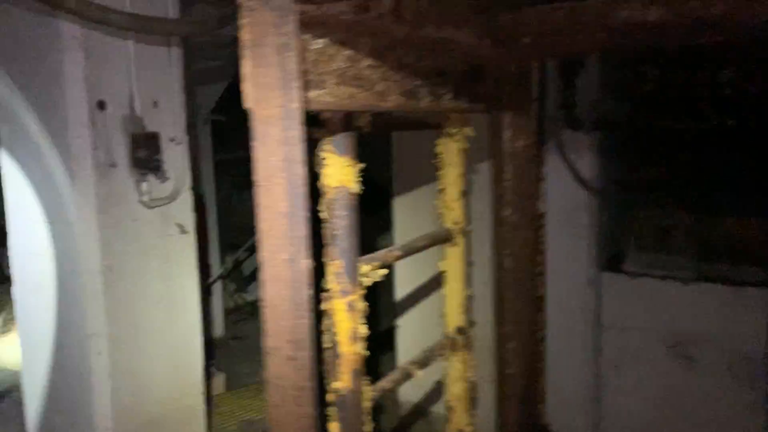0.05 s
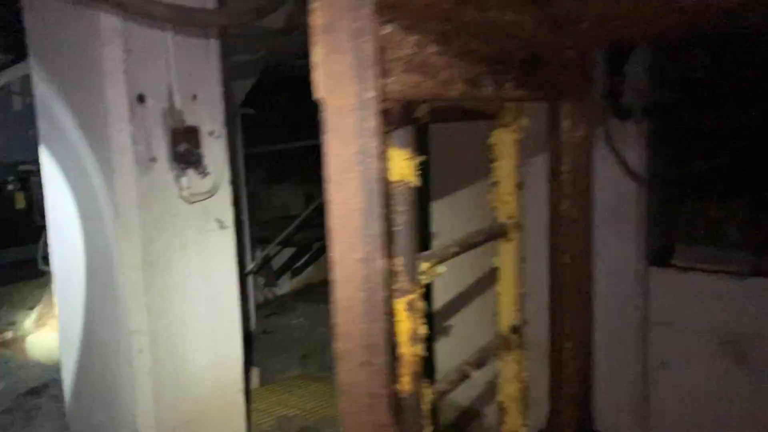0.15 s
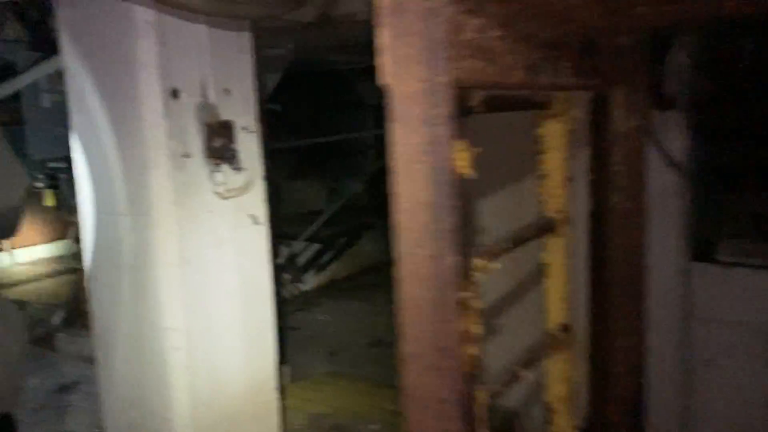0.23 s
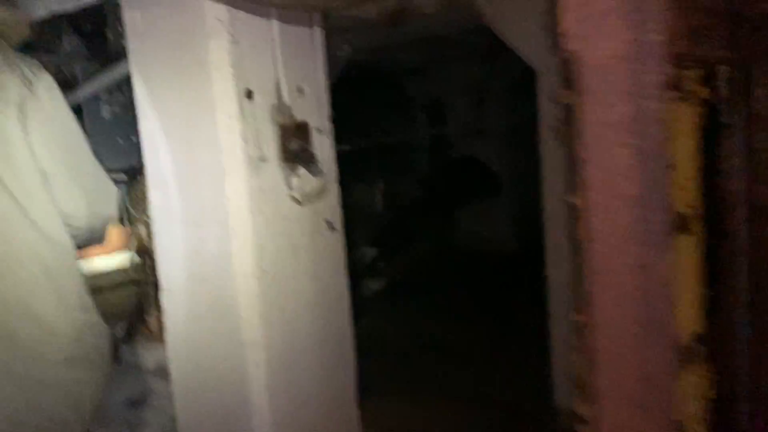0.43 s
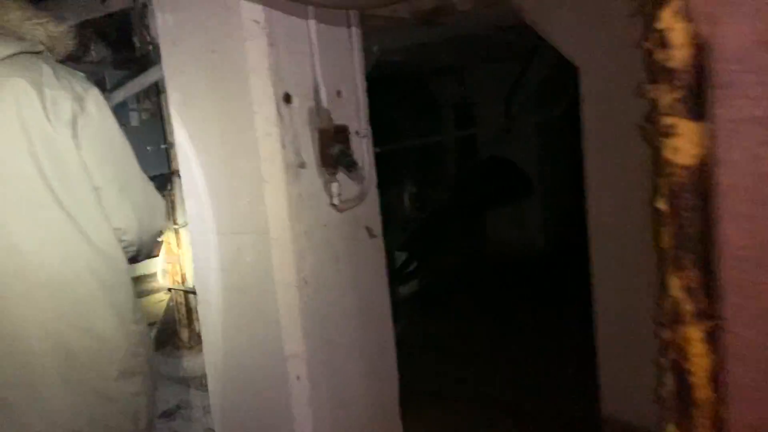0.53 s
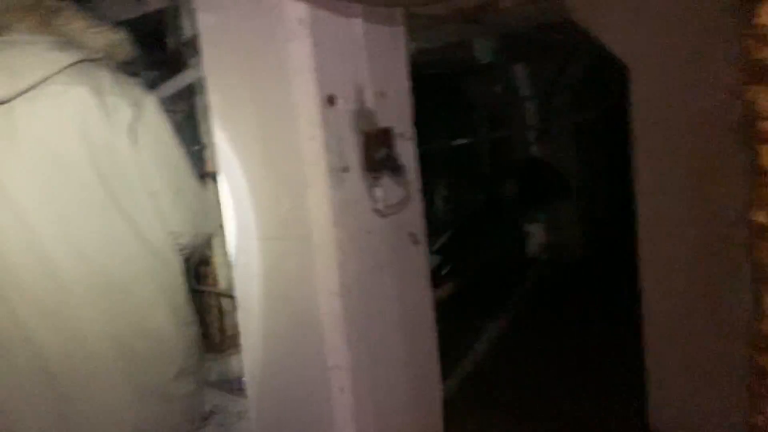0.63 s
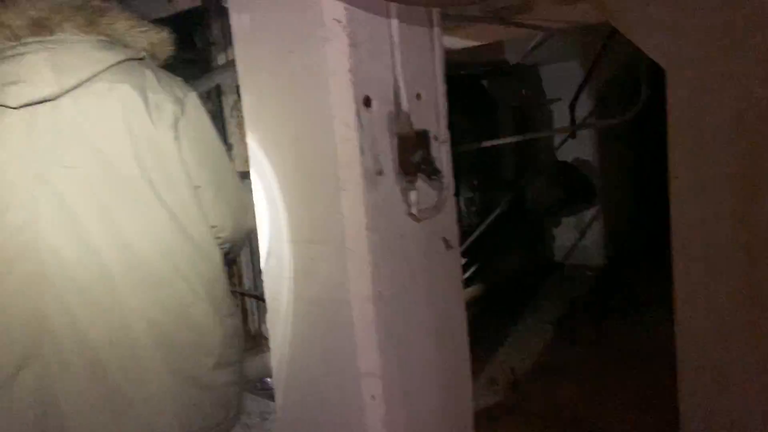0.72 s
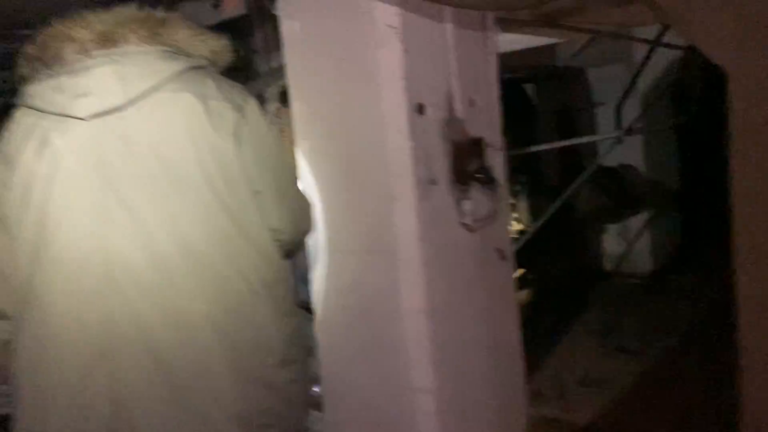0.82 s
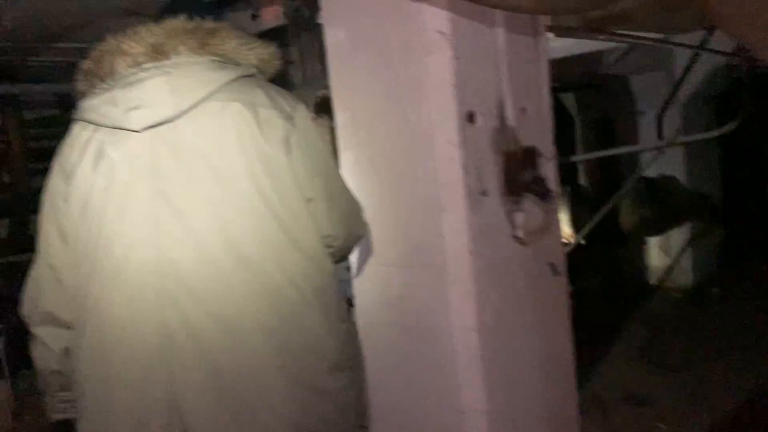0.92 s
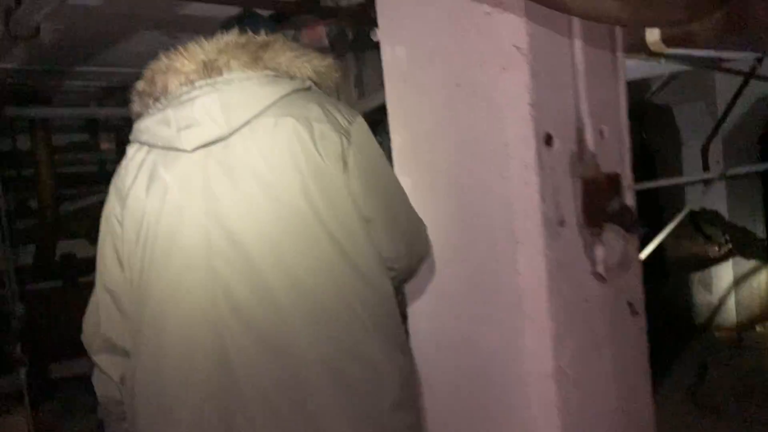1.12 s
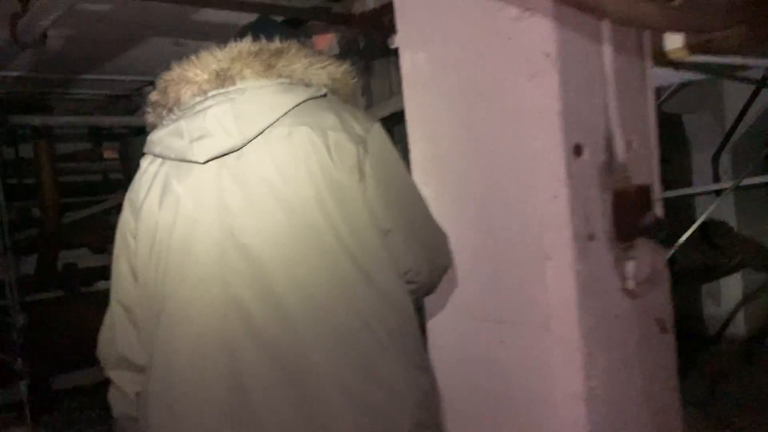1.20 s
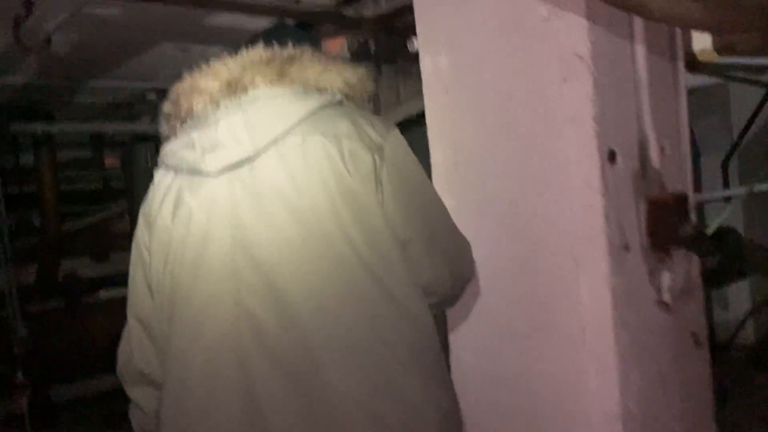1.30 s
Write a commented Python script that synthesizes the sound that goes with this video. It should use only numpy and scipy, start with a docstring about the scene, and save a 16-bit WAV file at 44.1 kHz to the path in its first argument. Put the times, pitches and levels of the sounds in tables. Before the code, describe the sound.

A footstep crunches and clacks on rubble and glass bits, followed by faint scuffs.

```python
"""A boot comes down on rubble in an empty factory hall: a loose slab knocks in its damped modes,
grit crunches in many tiny fractures and bits of glass ring. The debris settles, a tile chinks,
and the next step scuffs the floor with a swish of coat fabric, both sounds of friction.
Reflections in the hall add a dull tail; soft footfalls thud under a quiet low background."""
import sys
import numpy as np
from scipy import signal
from scipy.fft import rfft, irfft
from scipy.io import wavfile
from scipy.ndimage import uniform_filter1d

SR = 44100
rng = np.random.default_rng(int(sys.argv[2]) if len(sys.argv) > 2 else 0)


def log_audio(samples):
    """Write samples as a 16-bit WAV file to the path given in sys.argv[1]."""
    # one column per channel
    frames = np.atleast_2d(samples).T
    # limit to full scale, then quantise
    limited = np.clip(frames, -1, 1)
    pcm = np.round(limited * 32767).astype(np.int16)
    wavfile.write(sys.argv[1], SR, pcm)


N = 59535

# likeness of left and right (frequency [Hz], correlation [-1 to 1])
COHERENCE = [(50, .95), (200, 0.6), (600, .55), (1500, 0.4), (3500, .05), (6000, -.1), (11000, -.45)]
# background air (frequency [Hz], spectral level [dB])
AIR_SPECTRUM = [(20, -17.5), (55, -2.5), (110, -3), (250, -3.5), (500, -15), (1000, -20), (2500, -18.5),
                (6000, -29), (15000, -42)]
# force of the boot on the grit (time [s], level [dB])
BOOT_FORCE = [(0, -67.5), (.12, -66.5), (.17, -63.5), (0.197, -45), (0.21, -25), (.226, -23), (0.249, -32),
              (.29, -33), (0.308, -31), (.35, -29), (.385, -30), (0.421, -39.5), (.47, -36.5), (.51, -44),
              (.6, -47.5), (.65, -64), (.9, -83.5), (1.35, -63.5)]
# crushed grit (frequency [Hz], spectral level [dB])
GRIT_SPECTRUM = [(40, -31.5), (130, -12), (220, -4), (450, -10), (880, -6), (1180, 3), (1500, -0.5),
                 (2150, 1.5), (2800, -4), (4200, -9), (7500, -13.5), (11000, -9.5), (16000, -19)]
# rustles of the coat (time [s], rise [s], t60 [s], level [dB], centre [Hz], width [octaves])
RUSTLES = [(.02, 0.039, 0.93, -54.5, 295, 1.09), (.03, .02, 0.38, -53.5, 15400, .08),
           (.125, 0.014, 0.34, -53, 3280, 0.31), (.13, 0.065, 0.094, -44.5, 6000, 1.6),
           (.16, 0.028, .1, -55.5, 400, 1), (0.683, .015, 0.22, -47, 15130, .08),
           (1.06, .04, .2, -56, 15200, .08)]
# soft footfalls (time [s], duration [s], frequency [Hz], level [dB])
FOOTFALLS = [(.195, 0.056, 142, -46), (.515, 0.029, 188.4, -44.5), (0.789, 0.072, 67, -52),
             (.9, 0.031, 85, -46.5), (0.949, 0.057, 58, -41), (1.071, 0.046, 95, -45.5),
             (1.076, 0.0233, 180, -42.5), (1.172, 0.12, 55, -53.5)]
# knocks of loose slabs (time [s], level [dB], pitch [ratio], rise [s])
SLAB_KNOCKS = [(0.2044, -10, 0.94, 0.0036), (0.2095, -6, 1.032, 0.0012), (0.2118, -1.5, 0.99, 0.0027),
               (.2155, -9, 1.036, 0.0012), (0.2244, -26, 1.38, 0.00066), (.236, -45, 1.2, .001),
               (0.2425, -24, 0.86, .001), (.3448, -15, .97, 0.0011), (0.3492, -20.5, 0.94, 0.0014),
               (.453, -29, 1.17, 0.0025), (0.4884, -26, 1.05, 0.00054), (0.5964, -38, 1.08, 0.00066),
               (.656, -44, 1.15, .002)]
# modes of a slab (frequency [Hz], level [dB], t60 [s])
SLAB_MODES = [(410, -28, 0.061), (1193, -4.5, 0.026), (1276, -2, .028), (1670, -9.5, 0.026),
              (2078, -6.5, 0.029), (4106, -21, .04)]
# single snaps of grit (time [s], level [dB], centre [Hz], width [octaves], t60 [s])
GRIT_SNAPS = [(.212, -26, 6030, 1.2, 0.15), (.345, -30.5, 635, 0.65, 0.06), (0.359, -29, 5000, 2.2, 0.0088),
              (.374, -36, 3500, 0.48, 0.029), (.453, -35, 3710, 0.46, 0.099),
              (0.487, -33.5, 3500, 0.42, 0.013), (.5375, -27, 8900, 1.2, 0.0052),
              (.608, -40, 4450, 0.87, .008), (.693, -37.5, 4030, 1.8, 0.017),
              (0.703, -43, 3030, 1.5, 0.022), (.7585, -34.5, 4150, 0.16, 0.017),
              (.759, -45.5, 10980, 1.1, 0.025), (.8, -51, 780, 0.57, 0.17), (.874, -45, 700, .5, .02),
              (0.922, -51.5, 12300, .1, 0.034), (0.977, -54, 12130, 0.056, 0.031),
              (1.078, -49, 654, 0.52, 0.075), (1.12, -38, 900, 0.41, 0.013),
              (1.281, -48.5, 4000, 0.23, 0.017), (1.318, -48.5, 1870, 1.1, 0.093),
              (1.344, -42.5, 1170, 1.4, 0.03)]
# modes of loose pieces (frequency [Hz], level [dB], t60 [s], left phase lead [rad])
SPLINTER = [(9390, -1, .045, 2.0), (11335, 0, .075, -.4)]  # glass
SHARD = [(4040, -17, .18, -.5), (6113, -4, .19, -.4), (8550, 0, .07, -3.0), (9630, -6, .06, 1.6),
         (11380, -10, .06, -.3), (13980, -14, .09, 2.5)]  # glass
SLIVER = [(9405, 0, .07, 2.0), (14550, -15, .09, 2.5)]  # glass
CHIP = [(6140, -7, 0.11, -.8), (11150, 2.5, 0.068, 0.036)]  # glass
BRICK = [(1418, -1, 0.068, 0.0009), (1705, 2, 0.039, 0.0096), (2074, -5, 0.038, 0.011),
         (3850, -14, 0.034, 0)]
TILE = [(2570, -8, .14, -2), (2655, -2.5, 0.052, -2.14), (3510, -7.5, 0.06, -1.3), (3773, -1, 0.044, -1.33),
        (4330, -2, .03, -0.22), (4570, 5, 0.024, 0.5), (4970, -7, 0.075, 0.93), (6880, 0, 0.011, 1.7)]
TWIG = [(1410, 0, 0.0048, 0), (2115, 0, .005, 0)]  # dry wood
# impacts on those pieces (time [s], piece [mode table], level [dB], tilt [dB/octave])
PIECE_IMPACTS = [(.3135, SPLINTER, -24, -12), (.325, SLIVER, -20.5, 0), (.322, SHARD, -37, -14.5),
                 (.373, SHARD, -24.5, 7), (.392, CHIP, -27, -1), (.557, BRICK, -29.5, -3),
                 (.759, BRICK, -38, 3), (.767, BRICK, -39, 3.5), (0.7984, TILE, -37, -2.5),
                 (.8083, TILE, -31.5, 7), (1.1442, TWIG, -18.5, -1.5)]
# scuffs of the sole (time [s], rise [s], t60 [s], level [dB], tilt [dB/octave])
SOLE_SCUFFS = [(.686, 0.0035, 0.44, -45, 0.5), (0.796, 0.0025, 0.12, -40.5, 8), (1.046, .008, .25, -50, 10),
               (1.065, 0.039, 0.22, -43, 9.5), (1.105, 0.048, 0.097, -41, 4),
               (1.11, 0.066, 0.38, -45.5, -1.5)]
# scraping sole (frequency [Hz], spectral level [dB])
SCUFF_SPECTRUM = [(60, -14.5), (250, -2), (800, -7), (1700, 6), (3000, -4.5), (4500, -5.5), (8000, -11.5),
                  (12000, -16), (15500, -27)]
# squeaks of rubbing fabric (time [s], duration [s], start pitch [Hz], end pitch [Hz], level [dB])
FABRIC_SQUEAKS = [(1.078, 0.015, 5570, 5550, -42), (1.087, 0.018, 5470, 4900, -37),
                  (1.111, 0.017, 4540, 4660, -38)]
# reverberation time of the hall (frequency [Hz], t60 [s])
HALL_DECAY = [(150, 1.55), (1200, 1.0), (2500, 0.32), (5000, 0.52), (10000, 0.54), (16000, 1.13)]
# initial colour of the hall's tail (frequency [Hz], level [dB])
HALL_SPECTRUM = [(150, -1), (700, 2.5), (1200, -4), (2000, 0.5), (4000, 3.5), (9000, -10), (16000, -6.5)]

AIR_DB = -56.5
GRAINS_PER_S, GRAIN_SPREAD_DB, GRAIN_DECAY_S = 3500, 3, 0.00058
TINKLE_DB, TINKLE_T60_S, TINKLES_PER_S = -10, .022, 220  # level relative to the grit
TINKLE_LOW_HZ, TINKLE_HIGH_HZ = 3500, 15060
CLINK_RISE_S, CLINK_PAN_DB = 0.0011, -0.2
CHATTER_DEPTH, CHATTER_HZ, CHATTER_ONSET_S = 0.3, 160, 0.004
SQUEAK_JITTER, SQUEAK_LEAD_RAD, SQUEAK_PAN_DB = 0.041, 3, -2.5
TAIL_DB, TAIL_RISE_S = -15, 0.006
EARLY_DB, EARLY_T60_S, REFLECTIONS_PER_S = -11, 0.27, 2500
DEBRIS_PAN_DB = -0.55
CEILING, CUTOFF_HZ = .95, 15950


def amp(db):
    """Amplitude ratio of a level in decibels."""
    return 10 ** (np.asarray(db) / 20)


def unit(x):
    """Normalisation to an rms of 1."""
    return x / np.sqrt(np.mean(x ** 2) + 1e-20)


def read(points, hz):
    """Interpolation of a table on a log-frequency axis."""
    table_hz, value = np.transpose(points)
    return np.interp(np.log(hz + 1), np.log(table_hz + 1), value)


def add(mix, start, sound):
    """Superposition: a sound joins the mix at its start time in seconds."""
    part = mix[:, max(round(start * SR), 0):][:, :sound.shape[-1]]
    part += sound[..., :part.shape[1]]


def pan(db):
    """Level difference between the ears: positive values lift the left and lower the right."""
    return amp(np.array([[db], [-db]]))


def colour(pair, spectrum, tilt_db=0):
    """Spectral shaping: two independent signals take on one spectrum and partial coherence."""
    hz = np.fft.rfftfreq(N, 1 / SR)
    left, independent = rfft(pair)
    alike = np.clip(read(COHERENCE, hz), -1, 1)
    right = alike * left + np.sqrt(1 - alike ** 2) * independent
    gain = amp(read(spectrum, hz) + tilt_db * np.log2(hz + 1))
    return unit(irfft(gain * np.array([left, right]), N))


def hiss(centre_hz, octaves):
    """Band-pass noise, 6 dB down at the given number of octaves either side of the centre."""
    hz = np.geomspace(30, 20000, 200)
    band_db = -6 * (np.log2(hz / centre_hz) / octaves) ** 2
    return colour(rng.standard_normal((2, N)), np.c_[hz, band_db])


def swell(rise, t60):
    """Envelope of linear rise and exponential decay."""
    t = np.arange(N) / SR
    return np.minimum(t / rise, 1) * amp(-60 * np.maximum(t - rise, 0) / t60)


def air():
    """Stationary noise: the background air has most of its power at low frequencies."""
    return amp(AIR_DB) * colour(rng.standard_normal((2, N)), AIR_SPECTRUM)


def grains(per_s, spread_db, shapes=12):
    """Shot noise: tiny fractures of uneven size occur at random, each a decaying burst."""
    strength = amp(spread_db * np.minimum(rng.exponential(1, N), 3.5))
    impulses = strength * (rng.random(N) < per_s / SR)
    shape, t = rng.integers(0, shapes, N), np.arange(256) / SR
    bursts = rng.standard_normal((shapes, 2, len(t))) * np.exp(-t / GRAIN_DECAY_S)
    return sum(signal.oaconvolve((impulses * (shape == k))[None], unit(burst), axes=1)[:, :N]
               for k, burst in enumerate(bursts))


def tinkles(crumbs=24):
    """Damped oscillators: crumbs of glass, struck at random, each ring at one natural frequency."""
    out, t = np.zeros((2, N)), np.arange(SR // 16) / SR
    for position, lead_cycles in rng.random((crumbs, 2)):
        hz = TINKLE_LOW_HZ + position * (TINKLE_HIGH_HZ - TINKLE_LOW_HZ)
        phase = 2 * np.pi * (hz * t + np.array([[lead_cycles], [0]]))
        ring = amp(-60 * t / TINKLE_T60_S) * np.sin(phase)
        hits = rng.random(N) * (rng.random(N) < TINKLES_PER_S / crumbs / SR)
        out += signal.oaconvolve(hits[None], ring, axes=1)[:, :N]
    return unit(out)


def crunch():
    """Amplitude modulation: grit crumbles and glass tinkles in proportion to the boot's force."""
    force = amp(np.interp(np.arange(N) / SR, *np.transpose(BOOT_FORCE)))
    grit = colour(grains(GRAINS_PER_S, GRAIN_SPREAD_DB), GRIT_SPECTRUM)
    return force * (grit + amp(TINKLE_DB) * tinkles())


def coat_rustles():
    """Friction noise: smooth fabric brushes past in soft bands of hiss."""
    out = np.zeros((2, N))
    for start, rise, t60, db, centre_hz, octaves in RUSTLES:
        add(out, start, amp(db) * swell(rise, t60) * hiss(centre_hz, octaves))
    return out


def footfalls():
    """Soft impact: body weight lands and drives the floor through a few low cycles."""
    out = np.zeros((2, N))
    for start, duration, hz, db in FOOTFALLS:
        t = np.arange(0, duration, 1 / SR)
        envelope = np.sin(np.pi * t / duration) ** 2
        add(out, start, amp(db) * envelope * np.sin(2 * np.pi * hz * t))
    return out


def slab_knocks():
    """Modal vibration: loose slabs rock against the floor; heavy damping keeps the hollow ring short."""
    out, t = np.zeros((2, N)), np.arange(SR // 8) / SR
    for start, db, pitch, rise in SLAB_KNOCKS:
        ring = sum(amp(mode_db - 60 * t / t60) * np.sin(2 * np.pi * hz * pitch * t)
                   for hz, mode_db, t60 in SLAB_MODES)
        add(out, start, amp(db) * np.minimum(t / rise, 1) * ring)
    return out


def grit_snaps():
    """Brittle fracture: larger bits of grit break one by one, each in a decaying band of noise."""
    out, t = np.zeros((2, N)), np.arange(N) / SR
    for start, db, centre_hz, octaves, t60 in GRIT_SNAPS:
        add(out, start, amp(db - 60 * t / t60) * hiss(centre_hz, octaves))
    return out


def clinks():
    """Free vibration: tipped pieces ring and chatter; a harder contact favours the upper modes."""
    out, t = np.zeros((2, N)), np.arange(SR // 4) / SR
    lowpass = signal.butter(2, CHATTER_HZ, fs=SR)
    depth = CHATTER_DEPTH * np.minimum(t / CHATTER_ONSET_S, 1)
    attack = np.minimum(t / CLINK_RISE_S, 1)
    for start, modes, db, tilt_db in PIECE_IMPACTS:
        mean_hz = np.mean([mode[0] for mode in modes])
        for hz, mode_db, t60, lead in modes:
            chatter = 1 + depth * unit(signal.lfilter(*lowpass, rng.standard_normal(len(t))))
            decay = amp(db + mode_db + tilt_db * np.log2(hz / mean_hz) - 60 * t / t60)
            tone = np.sin(2 * np.pi * hz * t + np.array([[lead], [0]]))
            add(out, start, attack * decay * chatter * tone)
    return out * pan(CLINK_PAN_DB)


def sole_scuffs():
    """Sliding friction: the sole drags over fine dust in dense grains that swell and fade."""
    out = np.zeros((2, N))
    for start, rise, t60, db, tilt_db in SOLE_SCUFFS:
        scrape = colour(grains(per_s=12000, spread_db=4.0), SCUFF_SPECTRUM, tilt_db)
        add(out, start, amp(db) * swell(rise, t60) * scrape)
    return out


def fabric_squeaks():
    """Periodic friction: ribbed fabric slides on itself with a rough gliding whistle."""
    out = np.zeros((2, N))
    for start, duration, from_hz, to_hz, db in FABRIC_SQUEAKS:
        progress = np.arange(0, 1, 1 / (duration * SR))
        waver = unit(uniform_filter1d(rng.standard_normal(N), 20))[:len(progress)]
        hz = (from_hz + (to_hz - from_hz) * progress) * (1 + SQUEAK_JITTER * waver)
        phase = 2 * np.pi * np.cumsum(hz) / SR + np.array([[SQUEAK_LEAD_RAD], [0]])
        add(out, start, amp(db) * np.sin(np.pi * progress) * np.sin(phase))
    return out * pan(SQUEAK_PAN_DB)


def hall(direct):
    """Reverberation: early reflections from floor and pillars, then a long, dull diffuse tail."""
    hz, frame_s, noise = signal.stft(rng.standard_normal((2, SR)), SR, nperseg=256)
    decay = amp(read(HALL_SPECTRUM, hz)[:, None] - 60 * frame_s / read(HALL_DECAY, hz)[:, None])
    tail = signal.istft(noise * decay, SR, nperseg=256)[1][:, :SR]
    t = np.arange(SR) / SR
    tail *= np.minimum(t / TAIL_RISE_S, 1) ** 2
    early = rng.standard_normal((2, SR)) * (rng.random((2, SR)) < REFLECTIONS_PER_S / SR)
    early *= (t > .003) * amp(-60 * t / EARLY_T60_S)
    response = sum(amp(db) * part / np.linalg.norm(part, axis=1, keepdims=True)
                   for db, part in [(TAIL_DB, tail), (EARLY_DB, early)])
    return signal.fftconvolve(direct, response, axes=1)[:, :N]


def scene():
    """Superposition: debris and coat reverberate in the hall, over dry footfalls and still air."""
    direct = slab_knocks() + clinks() + grit_snaps() + crunch() + sole_scuffs()
    direct += fabric_squeaks() + coat_rustles()
    return (direct + hall(direct)) * pan(DEBRIS_PAN_DB) + footfalls() + air()


def record(dry):
    """Soft saturation rounds off the highest peak; a low-pass filter then limits the band."""
    rounded = dry / (1 + (dry / CEILING) ** 8) ** (1 / 8)
    lowpass = signal.firwin(511, CUTOFF_HZ, window=("kaiser", 9), fs=SR)
    return signal.oaconvolve(rounded, lowpass[None], "same")


dry = scene()
out = record(dry)
log_audio(out)
```